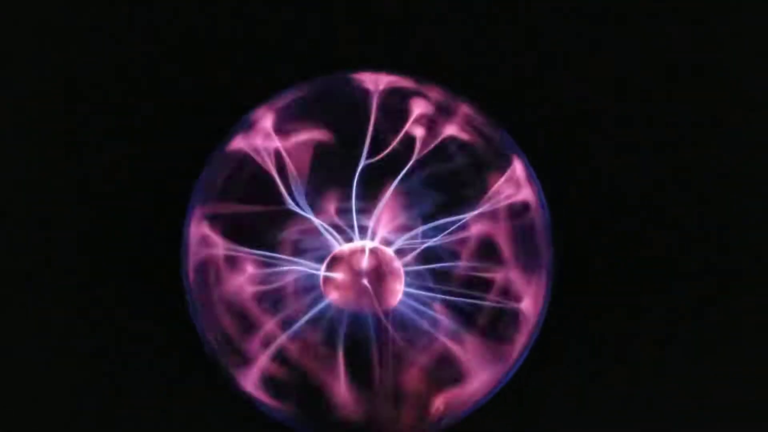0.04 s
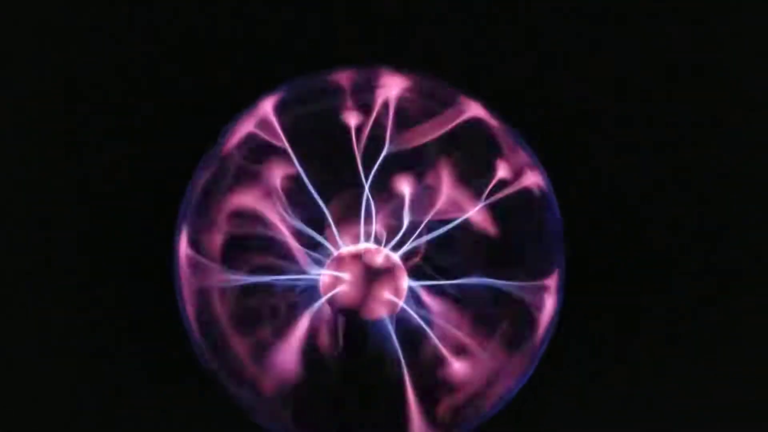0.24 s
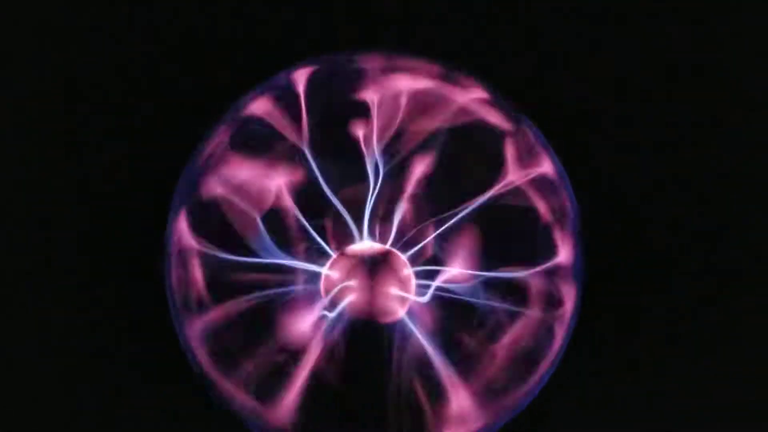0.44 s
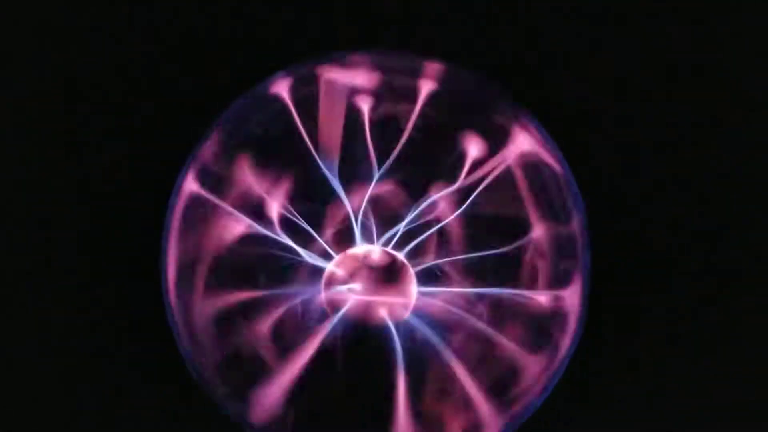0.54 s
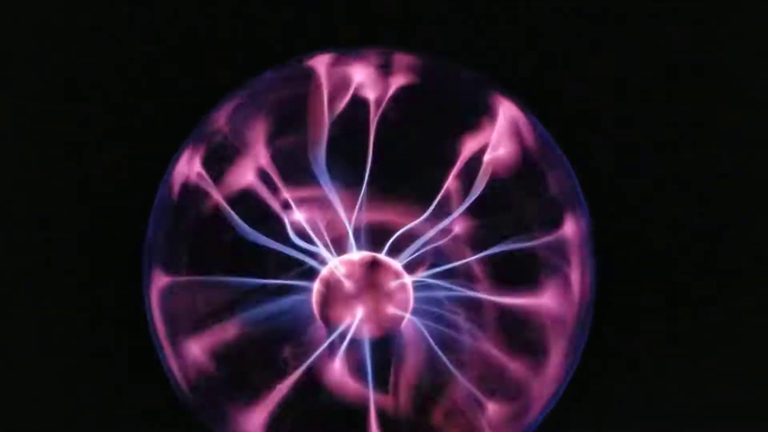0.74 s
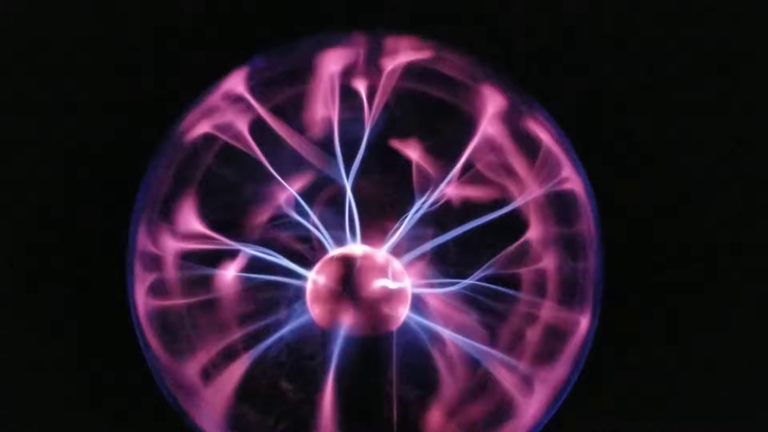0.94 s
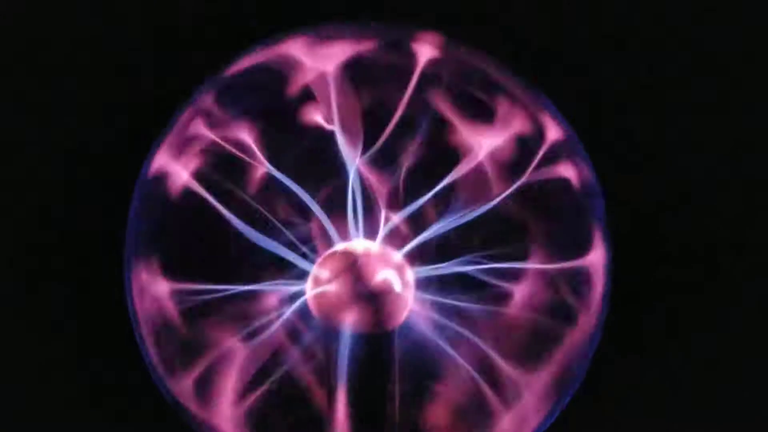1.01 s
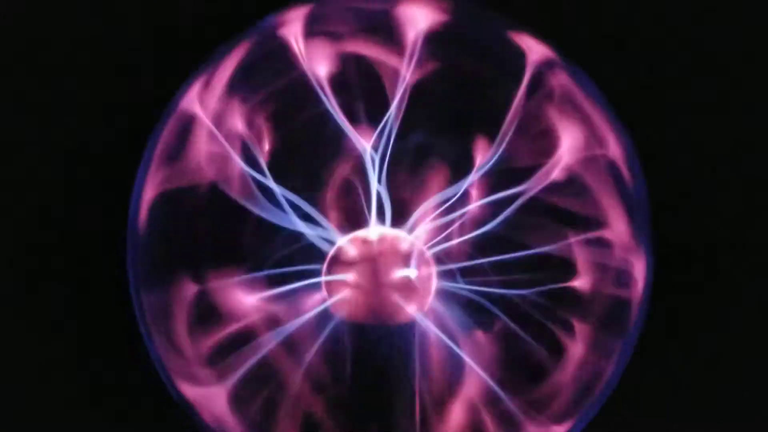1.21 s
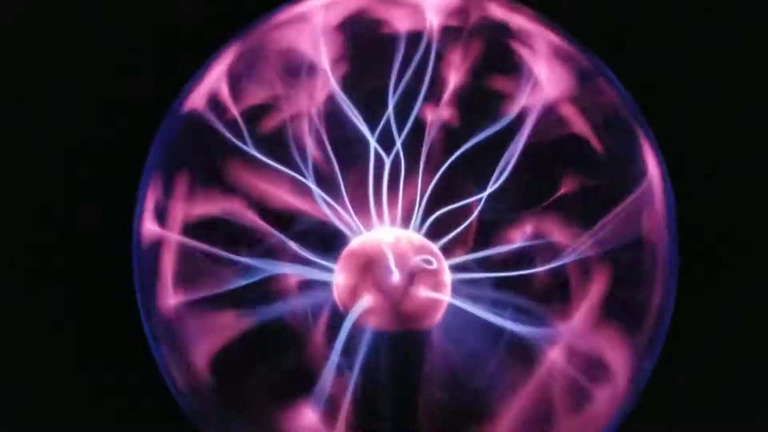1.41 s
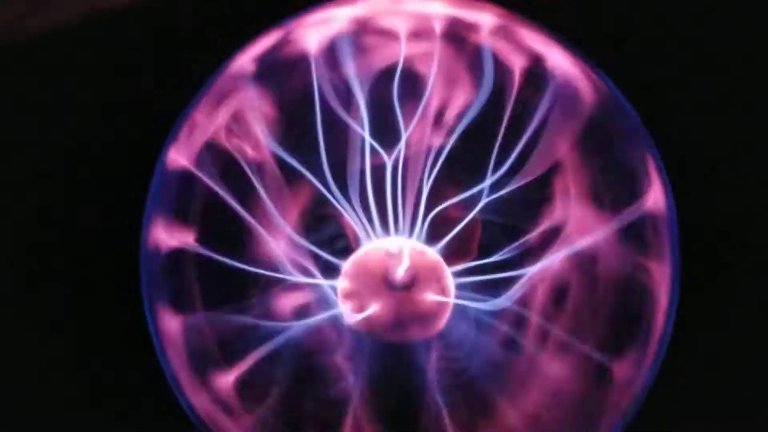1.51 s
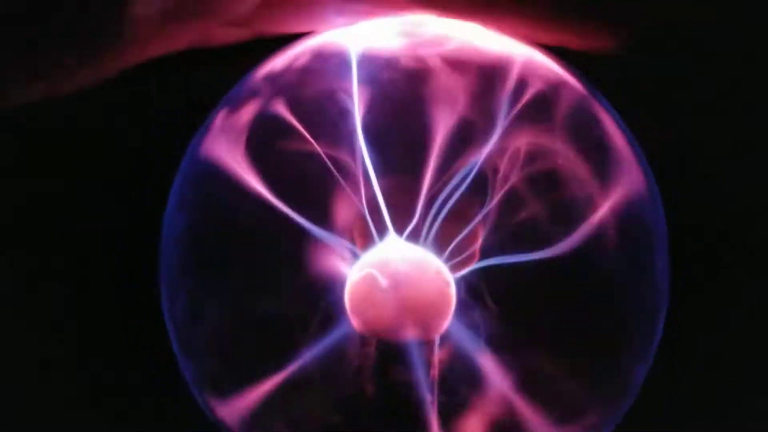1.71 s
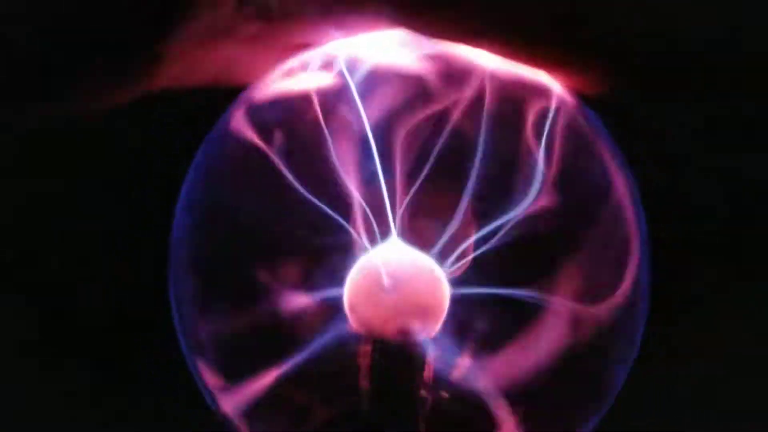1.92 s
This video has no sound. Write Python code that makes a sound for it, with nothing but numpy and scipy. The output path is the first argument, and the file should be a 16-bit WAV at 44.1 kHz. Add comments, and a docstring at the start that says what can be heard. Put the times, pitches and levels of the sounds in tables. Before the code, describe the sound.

Handling noise right on the left microphone: a finger slides, ticks and makes three quick hollow pops, then lets go. A quiet room remains, with low rumble, faint hiss and a thin, wavering electronic whine.

```python
"""Handling noise by a plasma globe

A quiet room, a hand-held camera moving in on a plasma globe. Right at the left microphone a finger
slides over the port, ticks, pops it three times by suction and lets go, all in the first half second.
A thin electronic whine wavers on the left, over low room rumble and the hiss of the two microphones."""
import sys
import numpy as np
from scipy import signal
from scipy.fft import rfft, irfft
from scipy.io import wavfile

SR = 44100
rng = np.random.default_rng(int(sys.argv[2]) if len(sys.argv) > 2 else 0)


def store_wav(level_fs):
    """Save 16-bit WAV to argv[1]."""
    pcm = np.round(np.clip(np.atleast_2d(level_fs), -1, 1) * 32767)
    wavfile.write(sys.argv[1], SR, pcm.T.astype(np.int16))


N = 85995
TIME = np.arange(N) / SR
BIN_HZ = np.maximum(np.fft.rfftfreq(N, 1 / SR), 1)
CUTOFF_HZ = 15830

# Room rumble. Each row: frequency in Hz, density in dB per Hz before its gain curve.
RUMBLE_COLOUR = [(15, -104.5), (33, -75), (55, -72), (74, -67.5), (98, -82.5), (120, -76), (160, -88),
                 (250, -95), (450, -110), (1000, -124), (3000, -150)]
# Its slow rise and fall. Each row: time in seconds, gain in dB.
RUMBLE_GAIN = [(0, 2.5), (.37, -1), (.46, 1.5), (.58, -0.5), (.78, 2), (1.06, -1.5), (1.3, 0), (1.95, -0.5)]
# Self-noise of each microphone. Each row: frequency in Hz, density in dB per Hz.
LEFT_HISS_COLOUR = [(200, -106), (1000, -113), (2500, -117), (3600, -120), (4800, -114), (6700, -113),
                    (8800, -117), (12000, -113), (16000, -118)]
RIGHT_HISS_COLOUR = [(200, -110), (1000, -113), (2500, -116), (4500, -122), (8000, -131), (11000, -120),
                     (12200, -108), (14000, -105), (16000, -107)]
# Top treble of the left hiss. Each row: frequency in Hz, density in dB per Hz before its gain curve.
TOP_HISS_COLOUR = [(9000, -135), (11000, -117), (12700, -104), (14100, -102), (14900, -109), (16000, -111)]
# Its rise and fall. Each row: time in seconds, gain in dB.
TOP_HISS_GAIN = [(0, 3), (.2, 9.5), (.45, 1), (.9, 1.5), (1.35, 3), (1.55, 0.5), (1.7, 1.5), (1.95, -3)]
# Course of the whine. Each row: time in seconds, pitch in Hz, level in dB before the sputter.
WHINE_COURSE = [(0, 9829, -67.5), (.14, 9800, -73), (.28, 9890, -72), (.5, 9870, -71), (.63, 9790, -76.5),
                (.72, 9800, -75), (1.0, 9800, -71.5), (1.22, 9730, -69.5), (1.27, 9750, -80.5),
                (1.54, 9590, -75), (1.6, 10200, -101), (1.95, 9800, -102)]
# Skin on the port: sliding hiss, dull pressing rub, scuff off the edge, and the hand's rustle.
# Each row: frequency in Hz, density in dB per Hz before the gain curve or fade.
SKIN_HISS_COLOUR = [(1200, -120), (1700, -104), (2100, -96), (2700, -100), (3400, -113), (4600, -101),
                    (5600, -103), (6700, -99), (8500, -112), (11000, -109), (13500, -99), (16000, -102)]
SKIN_RUB_COLOUR = [(60, -81.5), (150, -77.5), (380, -80.5), (600, -83), (950, -89.5), (1250, -94.5),
                   (1700, -90.5), (2800, -103), (4000, -118)]
EDGE_SCUFF_COLOUR = [(150, -63), (350, -59.5), (600, -76), (1100, -73.5), (2100, -74.5), (3500, -83),
                     (6000, -86.5), (9000, -93), (13000, -87.5), (16000, -88.5)]
RUSTLE_COLOUR = [(100, -90), (270, -79), (400, -91), (700, -112), (1500, -135)]
# How the finger slides and presses. Each row: time in seconds, gain in dB.
SKIN_HISS_GAIN = [(0, -4), (.1, -5.5), (.19, -0.5), (.25, 1.5), (.31, -1.5), (.36, -1), (.41, -6),
                  (.445, -4), (.475, -15.5), (.55, -45.5)]
SKIN_RUB_GAIN = [(0, -19.5), (.11, -23), (.19, -9), (.24, -8), (.25, 10), (.285, -2.5), (.316, 3.5),
                 (.35, -6.5), (.38, -8.5), (.42, -10), (.436, 1), (.465, -20), (.55, -32)]
# Resonances of the rasp. Each row: centre in Hz, width in Hz, opening level in dB.
RASP_BANDS = [(2080, 160, -72.5), (2600, 500, -74), (4650, 800, -70.5), (5330, 1700, -76),
              (6700, 1000, -70)]
# Low thuds: three soft shifts of the hand, then the thud under the first pop.
# Each row: centre in seconds, width in seconds, pitch in Hz, level in dB.
LOW_THUDS = [(0.031, 0.043, 86.2, -42), (0.12, 0.0087, 157, -38.5), (0.167, 0.051, 75, -42),
             (0.253, 0.012, 93.5, -38)]
# Ticks on the casing. Each row: start in seconds, gain in dB, left minus right in dB, low-pass in Hz.
GRIP_TICKS = [(.110, -46, 20, 11900), (.161, -47.5, -5, 13900), (.2001, -28, 34, 13200),
              (.2086, -30.5, 30, 6950), (.4298, -26, 30, 3880)]
# Three pops on the port; after the big one, the finger rebounds and the casing rings briefly (row 3).
# Each row: time in seconds, gain in dB, build-up in seconds, ring pitch in Hz, Q, low-pass in Hz,
# left minus right in dB.
POPS_AND_REBOUND = [(.2453, 2.5, .00018, 376, .85, 5300, 30.5),
                    (0.3224, 9, 0.00072, 279.4, 1.6, 8340, 53.5), (.3289, -0.5, .0004, 340, 8, 3000, 50),
                    (0.4296, -7.5, 0.000098, 345, 1.8, 12000, 35)]
# Hollow colour of the covered port. Each row: centre in Hz, gain in dB, Q.
PORT_BELLS = [(745.6, -1.5, 2.4), (1226, -9, 3.5), (1823, 3.5, 2.9), (3933, -12, 3.2), (6000, 3.5, 1.5)]


def from_db(db):
    """Decibels to gain."""
    return 10 ** (np.asarray(db) / 20)


def in_time(rows):
    """Each column of a curve at every sample."""
    seconds, *columns = np.transpose(rows)
    return [np.interp(TIME, seconds, column) for column in columns]


def pan(x, left_db):
    """Place a sound between the microphones; the nearer side keeps its level."""
    return x * from_db([[min(left_db, 0)], [-max(left_db, 0)]])


def noise(colour):
    """Noise with a given density in dB per Hz."""
    hz, db = np.transpose(colour)
    gain = from_db(np.interp(np.log(BIN_HZ), np.log(hz), db)) * np.sqrt(SR / 2)
    return irfft(rfft(rng.standard_normal(N)) * gain, N)


def noise_pair(colour):
    """Unrelated noise for each microphone."""
    return np.array([noise(colour), noise(colour)])


def flutter(spread_hz, centre_hz=0):
    """Random motion of unit deviation, mostly within spread_hz of the centre."""
    motion = irfft(rfft(rng.standard_normal(N)) / (1 + ((BIN_HZ - centre_hz) / spread_hz) ** 2), N)
    return motion / motion.std()


def swell(centre_s, width_s, hz, db):
    """A tone that rises and fades smoothly."""
    offset = TIME - centre_s
    envelope = from_db(db) * np.exp(-(offset / width_s) ** 2)
    return envelope * np.sin(2 * np.pi * (hz * offset + rng.random()))


def bell(x, hz, gain_db, q):
    """A peak or a dip in the response."""
    w, a = 2 * np.pi * hz, from_db(gain_db / 2)
    return signal.lfilter(*signal.bilinear([1, w * a / q, w * w], [1, w / (a * q), w * w], SR), x)


def roll_off(x, hz, kind="low"):
    """A gentle first-order low-pass or high-pass."""
    return signal.lfilter(*signal.butter(1, hz, kind, fs=SR), x)


def room_rumble(shared=0.88):
    """Low room tone, most of its power common to both microphones."""
    rumble = np.sqrt(shared) * noise(RUMBLE_COLOUR) + np.sqrt(1 - shared) * noise_pair(RUMBLE_COLOUR)
    return pan(rumble * from_db(in_time(RUMBLE_GAIN)[0]), left_db=2.5)


def microphone_hiss():
    """Each microphone's own hiss; on the left the top treble rises and falls."""
    left = noise(LEFT_HISS_COLOUR) + noise(TOP_HISS_COLOUR) * from_db(in_time(TOP_HISS_GAIN)[0])
    return np.array([left, noise(RIGHT_HISS_COLOUR)])


def whine(waver_hz=25):
    """A thin electronic tone off to the left, wavering and sputtering."""
    hz, db = in_time(WHINE_COURSE)
    phase = 2 * np.pi * np.cumsum(hz + waver_hz * flutter(spread_hz=160)) / SR
    sputter = np.maximum(1 + .5 * flutter(spread_hz=45), 0)
    return pan(np.sin(phase) * from_db(db) * sputter, left_db=20)


def finger_rub():
    """Skin slides over the left port: a hiss and a dull rub, catching unevenly together."""
    catch_db = 4.5 * flutter(spread_hz=122)
    hiss = noise_pair(SKIN_HISS_COLOUR) * from_db(in_time(SKIN_HISS_GAIN)[0] + .5 * catch_db)
    rub = noise_pair(SKIN_RUB_COLOUR) * from_db(in_time(SKIN_RUB_GAIN)[0] + catch_db)
    return pan(hiss, left_db=25.5) + pan(rub, left_db=21)


def finger_rasp(rustle_fade_s=.17, rasp_fade_s=.19):
    """The slide opens with a low rustle and a hollow rasp; both fade as the finger presses."""
    rustle = noise(RUSTLE_COLOUR) * np.exp(-(TIME / rustle_fade_s) ** 2)
    rasp = sum(from_db(db) * flutter(width_hz / 2, hz) for hz, width_hz, db in RASP_BANDS)
    return pan(rustle + rasp * np.exp(-(TIME / rasp_fade_s) ** 2), left_db=26)


def low_thuds():
    """Close on the left: three soft shifts of the hand, then the thud under the first pop."""
    return pan(sum(swell(*row) for row in LOW_THUDS), left_db=32)


def grip_ticks(grit=0.59, decay_s=0.00012):
    """The grip ticks drily on the casing: each a sharp spike with a trace of grit behind it."""
    out = np.zeros((2, N))
    age = TIME[:SR // 100]
    for start_s, db, left_db, dull_hz in GRIP_TICKS:
        tick = grit * rng.standard_normal(len(age)) * np.exp(-age / decay_s)
        tick[0] = -1  # the spike
        tick = bell(roll_off(tick, dull_hz), hz=1680, gain_db=9.5, q=1)
        start = int(start_s * SR)
        out[:, start:start + len(age)] += pan(from_db(db) * tick, left_db)
    return out


def pops_and_rebound():
    """Three suction pops ring the port; after the big one, the finger rebounds and the casing rings."""
    out = np.zeros((2, N))
    for at_s, db, build_s, hz, q, dull_hz, left_db in POPS_AND_REBOUND:
        break_off = np.clip((at_s - TIME) * SR, 0, 1)
        pulse = -np.exp(np.minimum(TIME - at_s, 0) / build_s) * break_off
        w = 2 * np.pi * hz
        resonance = signal.bilinear([w / q, 0], [1, w / q, w * w], SR)
        ring = signal.lfilter(*resonance, pulse + 1e-18)  # the tiny offsets prevent underflow
        out += pan(from_db(db) * roll_off(ring + 1e-18, dull_hz), left_db)
    for row in PORT_BELLS:
        out = bell(out, *row)
    return roll_off(out, hz=50, kind="high")


def edge_scuff(start_s=0.3228, attack_s=0.003, hold_s=.014, decay_s=0.0058):
    """A short gritty scrape as the skin slips off the port edge after the big pop."""
    age = TIME - start_s
    envelope = np.clip(age / attack_s, 0, 1) * np.exp(-np.maximum(age - hold_s, 0) / decay_s)
    return pan(noise(EDGE_SCUFF_COLOUR) * envelope * from_db(flutter(spread_hz=500)), left_db=38)


def whistle():
    """A brief tone below the whine, dead centre, as the hand nears the glass."""
    return swell(centre_s=1.59, width_s=0.023, hz=8960, db=-78.5)


def scene():
    """Faint room tone, hiss and high tones, with the handling noise right on the microphone."""
    bed = room_rumble() + microphone_hiss() + whine() + whistle()
    skin = finger_rub() + finger_rasp() + edge_scuff()
    return bed + skin + low_thuds() + pops_and_rebound() + grip_ticks()


def record(dry):
    """The camera cuts the top treble steeply."""
    return signal.sosfilt(signal.ellip(12, .1, 80, CUTOFF_HZ, fs=SR, output="sos"), dry)


dry = scene()
out = record(dry)
store_wav(out)
```